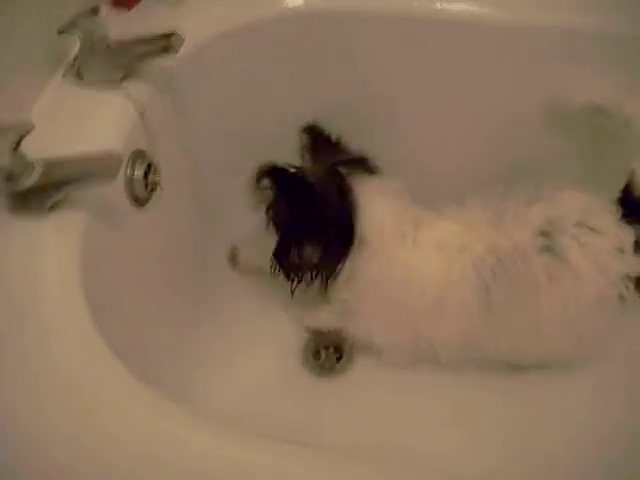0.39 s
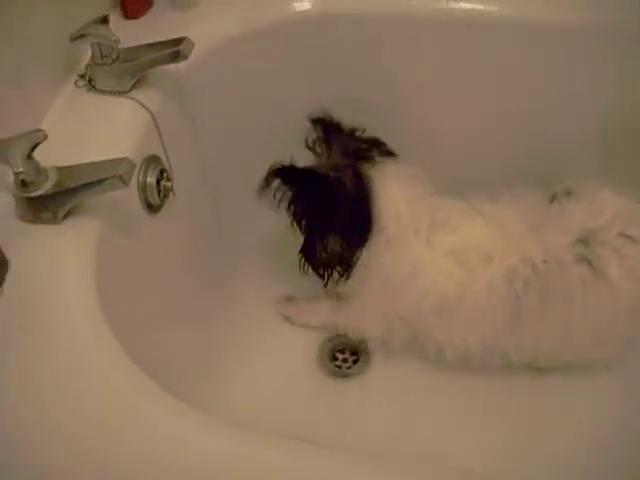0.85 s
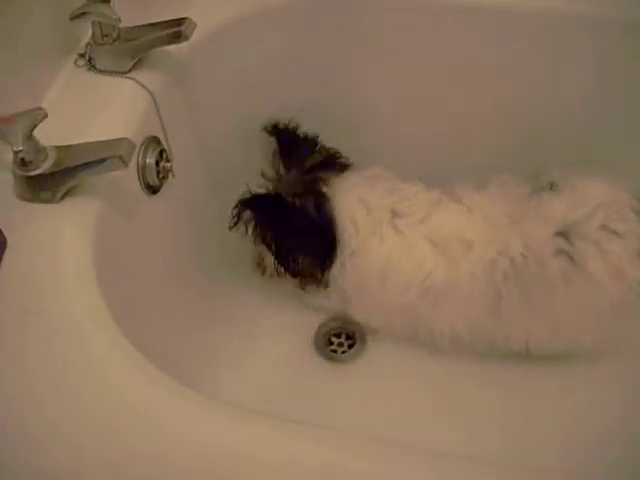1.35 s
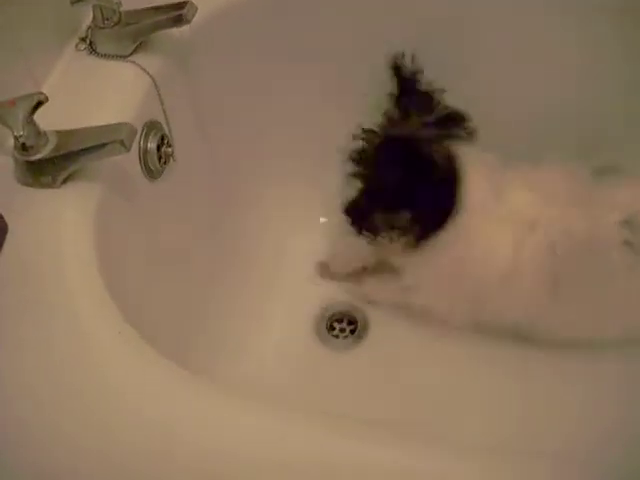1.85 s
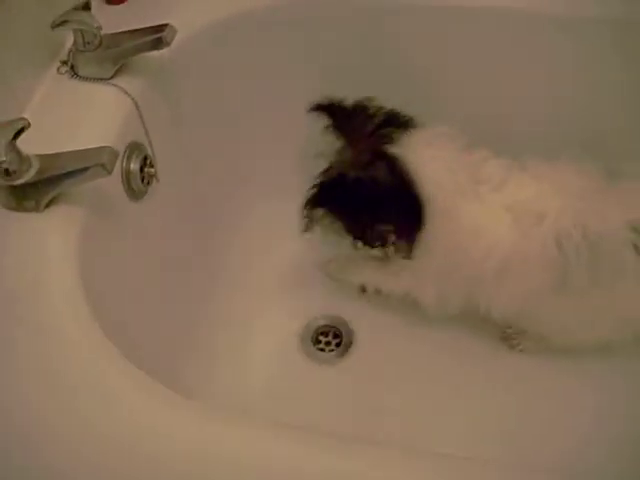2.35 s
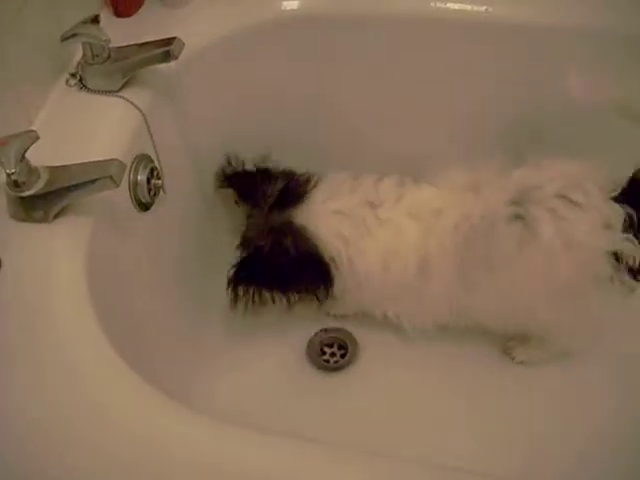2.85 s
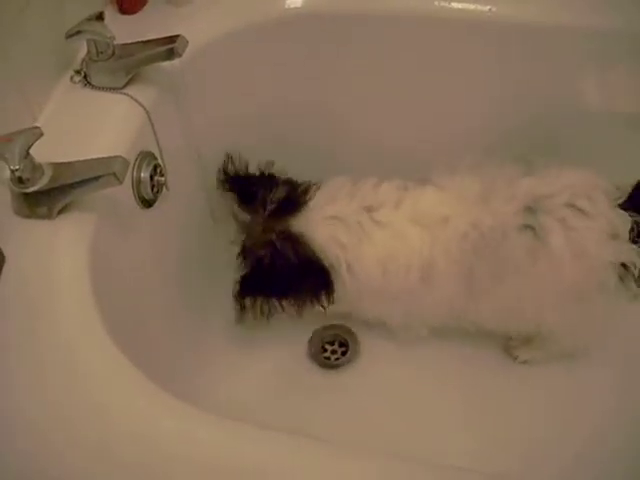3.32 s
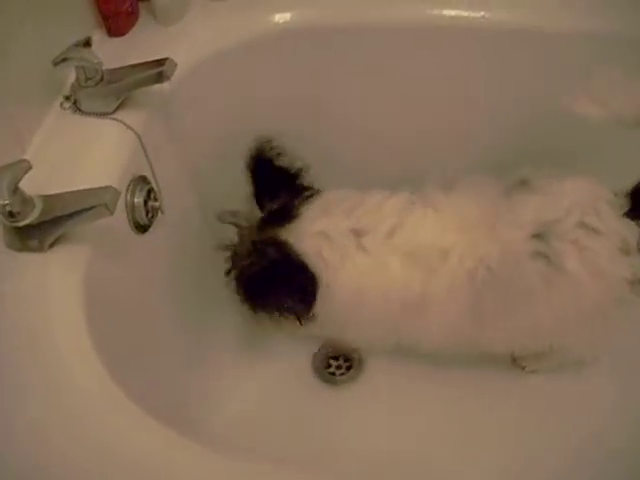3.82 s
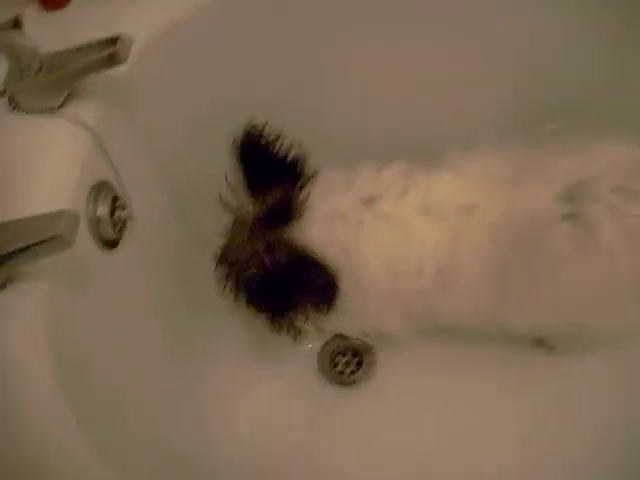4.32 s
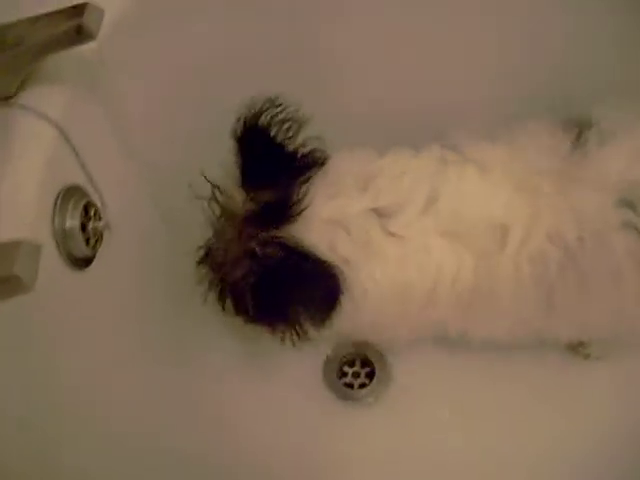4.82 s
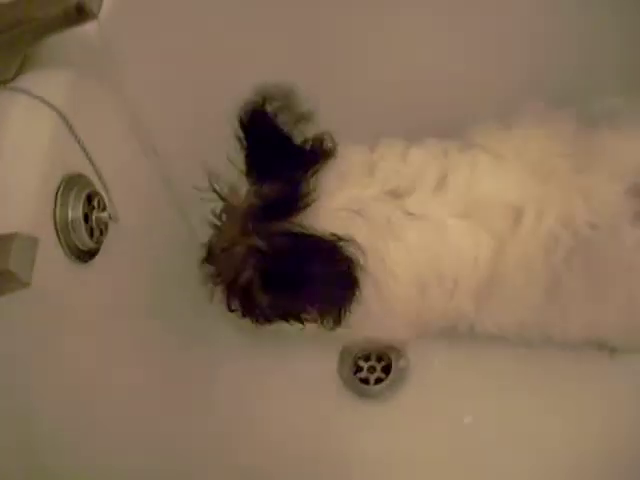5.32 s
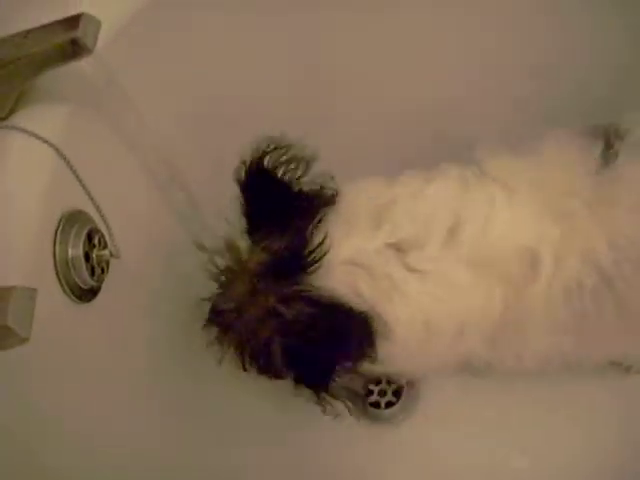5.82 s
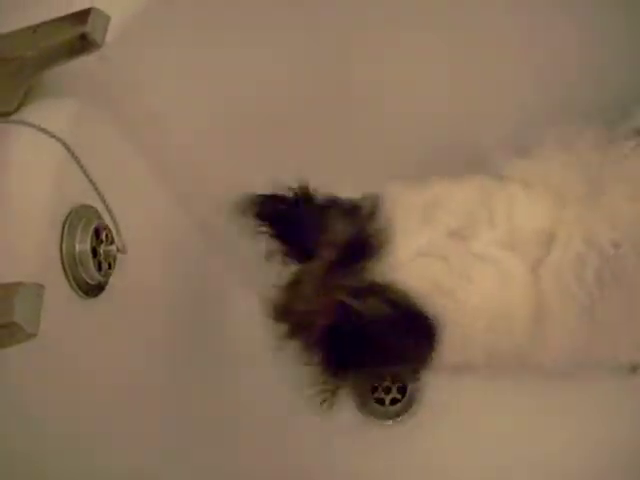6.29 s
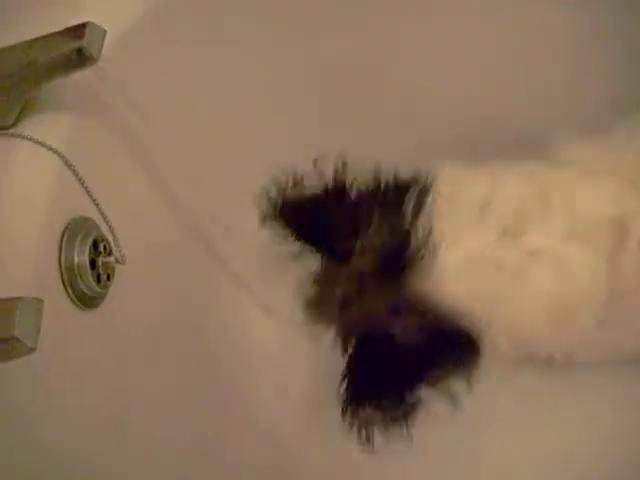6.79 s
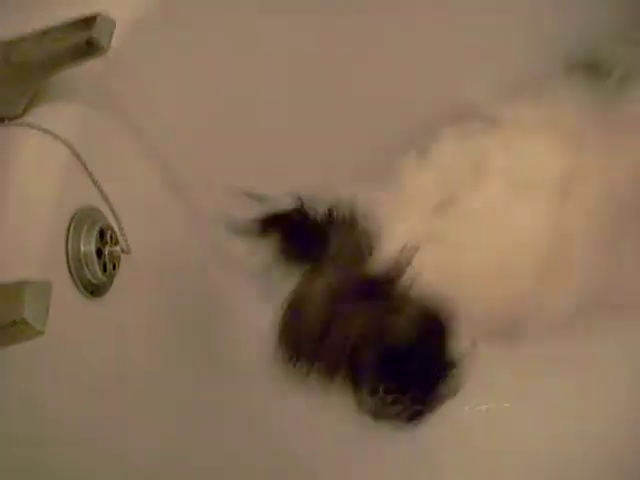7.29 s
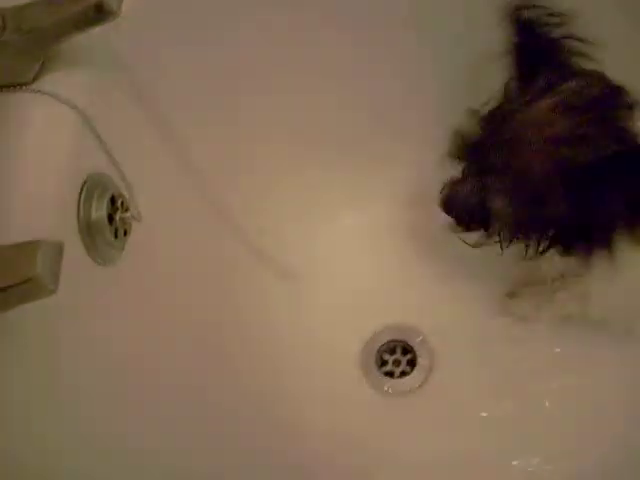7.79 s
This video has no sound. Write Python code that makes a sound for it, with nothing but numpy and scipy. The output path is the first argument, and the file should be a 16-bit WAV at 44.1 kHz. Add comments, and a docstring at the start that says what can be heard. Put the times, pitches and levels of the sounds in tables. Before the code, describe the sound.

A small dog's claws click and scrape on a hard bathtub floor, sparse at first, then faster, louder and wetter, with hollow dull bumps.

```python
"""A small dog digs at the bare floor of a bathtub: claws tap the enamel as damped sines with noise ticks,
and drag over it as clumps of short resonant slips; rakes rasp and wet claw tips snap.
The tub wall knocks hollow, bumps ring the shell modes over low booms, and tiles scatter echoes.
A microphone port resonance near 3 kHz colours skids and scrape; hiss, faint whines and rumble lie below."""
import sys
import numpy as np
from scipy import signal
from scipy.fft import rfft, irfft
from scipy.io import wavfile

SR = 44100
rng = np.random.default_rng(int(sys.argv[2]) if len(sys.argv) > 2 else 0)


def transcribe(signal):
    """Save signal, clipped to [-1, 1], as a 16-bit WAV file at the path in sys.argv[1]."""
    frames = np.atleast_2d(signal).T
    limited = np.clip(frames, -1, 1)
    pcm = np.round(limited * 32767).astype(np.int16)
    wavfile.write(sys.argv[1], SR, pcm)


def level_to_linear(level):
    """Convert decibel levels to linear amplitude factors, elementwise."""
    exponent = np.asarray(level, float) / 20
    return 10 ** exponent


N = 359395

# claw taps: (time [s], click peak [dB], click pitch [Hz], gain of skid and reverberation [dB re click])
TAPS = [(0.0393, -34.5, 3700, -23), (0.077, -33.5, 2920, -8.5), (0.3218, -28.5, 3540, -10),
        (0.3371, -23, 3300, -16), (0.595, -38, 3040, -11.5), (0.775, -29, 2900, -30),
        (0.936, -40.5, 3450, -5.5), (0.9528, -21, 2970, -13), (1.1459, -51, 3320, -6),
        (1.1732, -35.5, 3090, -15.5), (1.3805, -35, 4820, -16), (1.3889, -22, 2840, -11.5),
        (1.618, -26.5, 3440, -13), (1.831, -40, 2790, -21.5), (1.8533, -29, 2300, -1),
        (2.182, -55, 5340, -21), (2.578, -40, 3060, -10.5), (2.7437, -44.5, 2190, -15.5),
        (2.8026, -40, 4760, -4), (2.806, -25, 2990, -14), (2.9749, -39, 3520, -14.5),
        (3.0087, -39.5, 2950, -6.5), (3.2212, -33.5, 3470, -9.5), (3.2275, -25, 2290, -6),
        (3.315, -33, 2870, -17), (3.4088, -32.5, 2760, -8), (3.4157, -28, 2830, -15),
        (3.573, -43.5, 2960, -4), (3.5858, -43, 2600, -8), (3.7445, -46, 3330, -5),
        (3.7569, -36.5, 3320, -9.5), (3.899, -35.5, 3130, -9), (4.0406, -31, 3350, -13),
        (4.1738, -35.5, 2540, -10), (4.2011, -23, 2950, -15.5), (4.2954, -27.5, 2930, -19),
        (4.3697, -31.5, 2440, -8.5), (4.513, -32.5, 3070, -13.5), (4.554, -35.5, 2300, -22),
        (4.6025, -36, 4080, -23), (4.617, -30, 2810, -20), (4.705, -31.5, 2900, -8.5),
        (4.842, -29.5, 2830, -12), (4.9802, -45, 3130, -10), (5.0327, -28, 2730, -17),
        (5.048, -29.5, 3010, -14), (5.123, -45, 5160, -16), (5.1682, -35.5, 2710, -8.5),
        (5.184, -26.5, 2760, -16), (5.225, -30, 2930, -15), (5.345, -36.5, 3300, -11.5),
        (5.3639, -28, 2840, -15), (5.4822, -37, 2830, -7.5), (5.551, -32, 2990, -23),
        (5.5703, -32.5, 2790, -14), (5.6725, -37, 3400, -6), (5.6877, -26.5, 2630, -19),
        (5.7476, -35, 2940, -36), (5.8168, -32.5, 2980, -6), (5.8257, -19.5, 2830, -26),
        (5.8865, -27, 2030, -21), (5.908, -27.5, 2740, -12), (5.962, -30.5, 2930, -18),
        (5.9931, -19.5, 2830, -13.5), (6.1082, -30, 2810, -2), (6.1174, -19, 3240, -17),
        (6.23, -26, 2760, -15), (6.2732, -31.5, 3140, -5.5), (6.335, -29.5, 2730, -34),
        (6.3678, -21.5, 2860, -15.5), (6.4393, -13, 3250, -19.5), (6.4769, -4, 2824, -18),
        (6.6618, -16.5, 2750, -16), (6.777, -22, 3020, -9.5), (6.841, -15.5, 2940, -19.5),
        (7.0037, -31, 2750, -5), (7.0144, -20, 2730, -11), (7.0904, -20.5, 2870, -20),
        (7.1384, -25.5, 2920, -13.5), (7.1735, -10.5, 2904, -17), (7.356, -22.5, 2670, -16),
        (7.379, -25.5, 2980, -5.5), (7.508, -19, 3000, -30), (7.5216, -23.5, 2900, -9.5),
        (7.6504, -14, 2695, -16.5), (7.7824, -30.5, 3400, -14.5), (7.9092, -2.5, 2785, -15),
        (7.918, -3, 2860, -22), (8.0492, -15.5, 2900, -9), (8.076, -9, 2880, -19.5)]


def rms_one(x):
    """Normalisation by power: scale to unit rms."""
    return x / np.sqrt(np.mean(x ** 2) + 1e-20)


def peak_one(x):
    """Normalisation by amplitude: scale to unit peak."""
    return x / np.max(np.abs(x))


def in_time(curve):
    """Linear interpolation of a (time, level) curve, one value a sample."""
    s, level_db = np.transpose(curve)
    return np.interp(np.arange(N) / SR, s, level_db)


def coloured(x, spectrum):
    """Spectral shaping: weight each frequency of a noise by a (Hz, dB) curve; rms 1."""
    hz, level_db = np.transpose(spectrum)
    bins = np.maximum(np.fft.rfftfreq(len(x), 1 / SR), 1)
    gain = level_to_linear(np.interp(np.log(bins), np.log(hz), level_db))
    return rms_one(irfft(rfft(x) * gain, len(x)))


def band(x, low_hz, high_hz):
    """Band limiting by a Butterworth band-pass."""
    return signal.sosfilt(signal.butter(2, [low_hz, high_hz], "band", fs=SR, output="sos"), x)


def port(x, bypass_db):
    """Resonance of the microphone port, gain 1 at its top, plus the sound that passes around it."""
    port_hz, width_hz = 2830, 520
    r = np.exp(-np.pi * width_hz / SR)
    poles = [1, -2 * r * np.cos(2 * np.pi * port_hz / SR), r * r]
    resonance = signal.lfilter(np.array([1, 0, -1]) * (1 - r * r) / 2, poles, x)
    return resonance + level_to_linear(bypass_db) * x


def ring(t, hz, t60, rise_s):
    """Damped free vibration: a decaying sine that swells smoothly while the contact lasts."""
    swell = np.sin(np.pi / 2 * np.minimum(t / rise_s, 1)) ** 2
    return np.sin(2 * np.pi * hz * t) * level_to_linear(-60 * t / t60) * swell


def grains(shape, spread_db, share):
    """Random impulse process: sparse clicks of uneven size and random sign; rms 1."""
    sizes = level_to_linear(spread_db * np.minimum(rng.exponential(1, shape), 5)) * rng.choice([-1, 1], shape)
    return rms_one(sizes * (rng.random(shape) < share))


def chirps(low_hz, high_hz, cycles, share, spread_db):
    """Stick-slip: slips come in clumps, each rings a few cycles at one of ten pitches; rms 1."""
    count = N // 500 + 2
    clumps = np.interp(np.arange(N) / 500, np.arange(count), rng.standard_normal(count))
    slips = grains(N, spread_db, share) * level_to_linear(3.06 * clumps)
    dealt = rng.integers(0, 10, N)   # which pitch each slip excites
    out = 0
    for k, hz in enumerate(np.geomspace(low_hz, high_hz, 10)):
        r = level_to_linear(-60 * hz / (cycles * SR))   # falls 60 dB in the given cycles
        poles = [1, -2 * r * np.cos(2 * np.pi * hz / SR), r * r]
        rung = signal.lfilter([1, 0, -1], poles, slips * (dealt == k) + 1e-18)
        out = out + rung * np.sqrt(low_hz / hz)
    return rms_one(out)


def tick(count, t):
    """Broadband impact: bright noise ticks of a few milliseconds, peak 1."""
    noise = rng.standard_normal((count, len(t))) * level_to_linear(-60 * t / 0.007)
    noise = band(band(noise, 3600, 6800), 3000, 7500)
    return np.array([peak_one(n) for n in noise])


def echoes(count):
    """Scattered reflection: skid and echoes off tub and tiles start soon after a hit and die unevenly."""
    room_t60_s = 0.25
    after = np.arange(SR // 3) / SR
    fade = level_to_linear(-60 * after / room_t60_s) * np.clip((after - 0.003) / 0.0045, 0, 1)
    dense = grains((count, len(after)), spread_db=2.5, share=0.12)
    catches = grains((count, len(after)), spread_db=3.5, share=0.005)
    return fade * (0.85 * dense + 0.52 * catches)


def repeated(sound, echo):
    """Convolution: the sound, at unit energy, once for every echo."""
    return signal.fftconvolve(echo, sound / np.sqrt(np.sum(sound ** 2)))[:len(echo)]


def struck(events, direct, tails):
    """Superposition: each direct sound and its tail at the time and level of its row."""
    out = np.zeros(N + SR)
    for row, sound, tail in zip(events, direct, tails):
        at = round(row[0] * SR)
        out[at:at + len(sound)] += level_to_linear(row[1]) * sound
        out[at:at + len(tail)] += level_to_linear(row[1]) * tail
    return out[:N]


def background():
    """Stationary noise and pure tones: hiss and thin whines over a wavering low rumble."""
    # steady tones: (frequency [Hz], level [dB rms])
    whine_tones = [(753.7, -79.5), (1507, -84), (8786, -97.5)]
    # hiss colour: (frequency [Hz], relative density [dB per Hz])
    hiss_spectrum = [(20, -15.5), (150, -12), (300, -9), (450, -4.5), (700, -10), (1000, -11),
                     (1900, -11.5), (2900, -6.5), (4400, -20.5), (10000, -22.5), (12000, -42)]
    # low rumble strongest near 100 Hz: (time [s], level [dB rms])
    rumble_curve = [(0.0, -73), (0.88, -87.5), (5.99, -74.5), (7.53, -66.5), (8.15, -71.5)]
    rumble_spectrum = [(20, -5), (45, -8), (70, -10.0), (100, -1.0), (150, -13), (300, -28.5)]
    t = np.arange(N) / SR
    hiss = level_to_linear(-66.5) * coloured(rng.standard_normal(N), hiss_spectrum)
    whines = sum(np.sqrt(2) * level_to_linear(level_db) * np.sin(2 * np.pi * hz * t) for hz, level_db in whine_tones)
    rumble = level_to_linear(in_time(rumble_curve)) * coloured(rng.standard_normal(N), rumble_spectrum)
    return hiss + whines + rumble


def heaves():
    """Damped low resonance: the tub booms unevenly, a decaying sine with narrow-band noise."""
    # low booms, several of them under a bump: (time [s], gain [dB])
    low_booms = [(4.244, -69), (4.369, -62), (7.259, -50), (7.349, -40.5), (7.389, -53), (8.124, -55)]
    t60_s = 0.35
    t = np.arange(SR // 2) / SR
    wobble = rms_one(band(rng.standard_normal((len(low_booms), len(t))), low_hz=90, high_hz=190))
    swell = level_to_linear(-60 * t / t60_s) * np.minimum(t / 0.015, 1)
    boom = 0.43 * ring(t, 132, t60_s, rise_s=0.013)
    return struck(low_booms, [boom] * len(low_booms), 0.6 * swell * wobble)


def clunks():
    """Overdamped impact: one soft push, broad and low, with almost no ring."""
    # short dull clicks of small knocks: (time [s], peak [dB])
    dull_clicks = [(0.958, -51), (1.998, -50), (3.431, -45), (3.471, -45.5)]
    t = np.arange(SR // 20) / SR
    push = peak_one(band(np.exp(-t / 0.00023), low_hz=70, high_hz=1100))
    return struck(dull_clicks, [push] * len(dull_clicks), [0 * push] * len(dull_clicks))


def bumps():
    """Modal vibration: soft blows ring the tub shell, with a low boom and a dull dying rattle."""
    # body and legs bumping the tub: (time [s], shell peak before fading [dB], t60 of rattle and boom [s])
    blows = [(4.17, -47.5, 0.55), (4.243, -44, 0.87), (4.294, -38.5, 0.63), (4.33, -43.5, 0.34),
             (4.439, -52, 0.33), (6.112, -49.5, 1), (7.058, -45, 0.48), (7.348, -32, 0.37),
             (7.388, -41, 0.99)]
    # tub shell modes: (frequency [Hz], mean relative level [dB], t60 before the blow's fade [s])
    shell_modes = [(246.6, 5.5, 0.25), (420, 6, 0.2), (443, 1.5, 0.97), (525, -6, 0.49), (709, 7, 0.34),
                   (1030, 1, 0.13)]
    rattle_share, boom_db = 0.3, -17.5   # both relative to the shell peak
    t, out = np.arange(SR // 2) / SR, np.zeros(N + SR)
    strengths = rng.standard_normal((len(blows), len(shell_modes)))
    rattles = band(rng.standard_normal((len(blows), len(t))), low_hz=165, high_hz=950)
    for (s, peak_db, t60), strength, rattle in zip(blows, strengths, rattles):
        t60 = max(t60, 0.02)
        fade = level_to_linear(-60 * t / t60)
        shell = sum(level_to_linear(level_db + 4.5 * d) * ring(t, hz, mode_t60, rise_s=0.001)
                    for (hz, level_db, mode_t60), d in zip(shell_modes, strength))
        shell = peak_one(shell) * np.sqrt(fade)   # this added fade is half the rattle's, in dB
        dull = rattle_share * rms_one(rattle) * np.minimum(t / 0.011, 1) * fade
        boom = level_to_linear(boom_db) * ring(t, 130, t60, rise_s=0.045)
        at = round(s * SR)
        out[at:at + len(t)] += level_to_linear(peak_db) * (shell + dull + boom)
    return out[:N]


def knocks():
    """Damped wall resonance: a short hollow ring with a dull reverberant tail."""
    # pads landing, the tub wall knocks hollow: (time [s], ring peak [dB], pitch [Hz])
    pad_landings = [(0.19, -45.5, 1380), (0.598, -43.5, 1360), (0.953, -30.5, 1680), (1.387, -27, 1520),
                    (1.857, -19.5, 1564), (2.579, -44, 1550), (2.804, -25.5, 1400), (3.006, -39.5, 1530),
                    (3.228, -27.5, 1410), (3.586, -35, 1640), (3.937, -34, 1600), (4.04, -37.5, 1590),
                    (5.032, -40, 1620), (5.183, -35.5, 1620), (5.346, -38.5, 1500), (5.6, -43, 1610),
                    (5.675, -38, 1660), (5.741, -42.5, 1430), (5.825, -26, 1540), (6.116, -27, 1490),
                    (6.287, -32, 1610), (6.47, -32, 1960), (6.659, -33.5, 1730), (6.778, -22.5, 1276),
                    (7.015, -35.5, 1510), (7.062, -37, 1000), (7.226, -30.5, 1800), (7.313, -36, 1820),
                    (7.506, -39, 1710), (7.649, -37.5, 1690), (7.907, -30.5, 1780), (8.047, -19.5, 1200)]
    t, echo = np.arange(SR // 25) / SR, echoes(count=len(pad_landings))
    direct = [peak_one(ring(t, row[2], t60=0.014, rise_s=0.0012)) for row in pad_landings]
    reflected = np.array([repeated(d, e) for d, e in zip(direct, echo)])
    dull = level_to_linear(11) * band(echo, low_hz=900, high_hz=2300)
    return struck(pad_landings, direct, level_to_linear(-16) * (reflected + dull))


def snaps():
    """Sudden release: tiny bright damped clicks with a short hissing afterglow."""
    # wet claw tips snapping off the enamel: (time [s], click peak [dB], pitch [Hz])
    releases = [(0.464, -39.5, 6900), (1.854, -35, 6980), (6.104, -44, 6840), (6.253, -33, 6400),
                (6.32, -32.5, 6350), (6.3684, -36.5, 9050), (6.4757, -35, 8340), (6.557, -42, 9900),
                (6.666, -32, 6840), (6.682, -28.5, 6800), (6.782, -33, 7500), (6.826, -37, 6230),
                (7.1412, -50, 7200), (7.199, -36, 6500), (7.444, -50, 9380), (7.5055, -79, 8200),
                (7.605, -39, 10000), (7.6535, -46, 9650), (7.9089, -49, 6600), (8.0491, -29.5, 8100)]
    t, out = np.arange(SR // 12) / SR, np.zeros(N + SR)
    glow = rng.standard_normal((len(releases), len(t))) * level_to_linear(-12.5 - 60 * t / 0.18)
    for (s, peak_db, hz), noise in zip(releases, glow):
        click = peak_one(ring(t, hz, t60=0.004, rise_s=0.00015))
        at = round(s * SR)
        out[at:at + len(t)] += level_to_linear(peak_db) * (click + band(noise, 0.75 * hz, 1.1 * hz))
    return out[:N]


def rakes():
    """Impact and scattered friction: a bright tick, then a dying rasp of scattered clicks."""
    # claw edges raking: (time [s], tick peak [dB])
    claw_edges = [(0.0765, -34.5), (0.3217, -30.5), (0.4638, -42), (0.597, -40), (0.936, -39.5),
                  (1.1458, -48.5), (1.382, -38), (1.6183, -35), (1.8557, -30.5), (2.802, -34),
                  (3.408, -34.5), (3.585, -41), (5.962, -33.5), (6.111, -27.5), (6.4238, -36),
                  (6.6622, -33.5), (6.7754, -29), (6.8421, -18.5), (7.1365, -30.5), (7.521, -29),
                  (8.047, -25)]
    t, echo = np.arange(SR // 40) / SR, echoes(count=len(claw_edges))
    rasp = level_to_linear(10.0) * band(band(echo, low_hz=3700, high_hz=5460), low_hz=3300, high_hz=7100)
    return struck(claw_edges, tick(len(claw_edges), t), level_to_linear(-15) * rasp)


def drag():
    """Stick-slip friction: slipping claw tips excite port resonance, tub wall and a bright wet grit."""
    # how hard the claws drag: (time [s], scrape level [dB rms])
    drag_curve = [(0.0, -54.5), (0.5, -61), (1.61, -54.5), (2.11, -67), (2.52, -91), (2.97, -57.5),
                  (4.22, -50), (4.45, -53.5), (5.7, -54), (6.01, -45), (6.83, -51.5), (7.56, -43.5),
                  (7.76, -51.5), (7.9, -52), (8.15, -51)]
    wall_db, grit_dry_db, grit_wet_db = -9, -20, -7.5   # re scrape; grit just after a tap
    wet_from_s, wetting_s = 5.89, 0.3   # the claws reach the wet patch
    grit_fade_db_per_s = 58   # grit thins out after each tap as the stroke slows
    t, tap_s = np.arange(N) / SR, np.transpose(TAPS)[0]
    wet = np.clip((t - wet_from_s) / wetting_s, 0, 1)
    latest = np.maximum(np.searchsorted(tap_s, t) - 1, 0)
    since_s = np.abs(t - tap_s[latest])
    slips = chirps(low_hz=2070, high_hz=3930, cycles=10.5, share=0.06, spread_db=2.5)
    scrape = rms_one(port(slips, bypass_db=-12.5))
    grit = chirps(low_hz=4300, high_hz=10500, cycles=16.0, share=0.014, spread_db=4.3)
    wall = chirps(low_hz=1250, high_hz=1900, cycles=20.0, share=0.04, spread_db=3.5)
    wall = rms_one(band(wall, 1150, 2300))
    grit_db = grit_dry_db + (grit_wet_db - grit_dry_db) * wet
    grit_db = grit_db - grit_fade_db_per_s * np.minimum(since_s, 0.2)
    return level_to_linear(in_time(drag_curve)) * (scrape + level_to_linear(grit_db) * grit + level_to_linear(wall_db) * wall)


def taps():
    """Hard impact: a claw click and a bright tick; the stronger the tick, the broader the tail."""
    tick_db, tick_growth = -48.5, 0.31   # tick of a -30 dB tap [dB]; growth [dB per dB of tap]
    first_claw_db, same_paw_s = 5.5, 0.045   # first claw of a landing is brighter; taps closer are one paw
    t, echo = np.arange(SR // 40) / SR, echoes(count=len(TAPS))
    s, peak_db, pitch_hz, tail_db = np.transpose(TAPS)
    # the skid keeps the colour of its click
    own = np.array([band(e, 0.66 * hz, 1.36 * hz) for e, hz in zip(echo, pitch_hz)])
    middle = level_to_linear(17.0) * port(band(own, low_hz=1500, high_hz=4540), bypass_db=-4.5)
    bright = level_to_linear(14.0) * band(band(echo, low_hz=4100, high_hz=5474), low_hz=3400, high_hz=7840)
    clicks = [peak_one(ring(t, hz, t60=0.012, rise_s=0.0009)) for hz in pitch_hz]
    first = np.diff(s, prepend=-1) > same_paw_s
    level_db = tick_db + tick_growth * (peak_db + 30) + first_claw_db * first
    ticks = level_to_linear(level_db - peak_db)[:, None]   # re click
    direct = clicks + ticks * tick(len(TAPS), t)
    reflected = 0.54 * np.array([repeated(c, e) for c, e in zip(clicks, echo)])
    tails = reflected + ticks ** 0.37 * middle + ticks * bright
    return struck(TAPS, direct, level_to_linear(tail_db)[:, None] * tails)


def scene():
    """Linear superposition of all sources in one channel."""
    steady = background()
    tub = heaves() + clunks() + bumps() + knocks()
    claws = snaps() + rakes() + drag() + taps()
    return (steady + tub + claws)[None]


def band_limit(x):
    """A steep low-pass at the top of the band."""
    return signal.sosfilt(signal.butter(12, 12250, fs=SR, output="sos"), x)


def record(dry):
    """Low-pass filtering: the top is cut above 11.2 kHz."""
    mix = signal.sosfilt(signal.butter(8, 11200, fs=SR, output="sos"), dry)
    return band_limit(mix)


dry = scene()
out = record(dry)
transcribe(out)
```